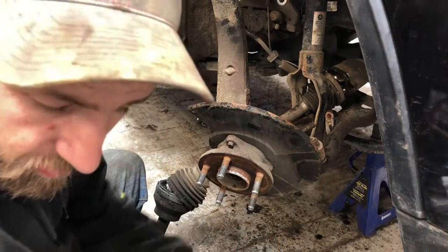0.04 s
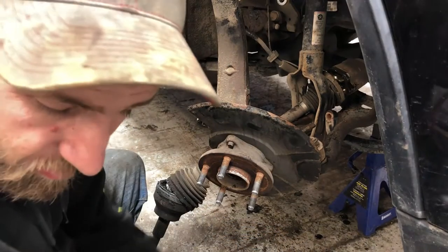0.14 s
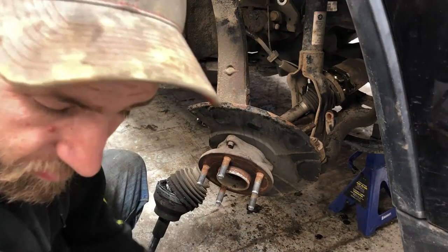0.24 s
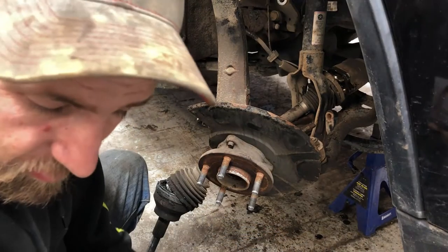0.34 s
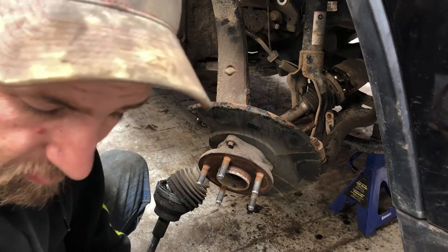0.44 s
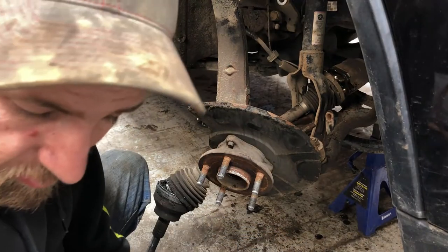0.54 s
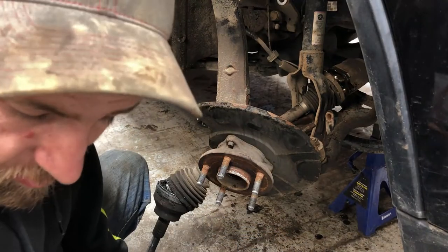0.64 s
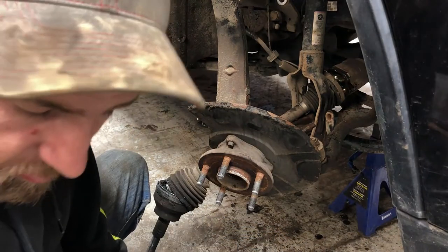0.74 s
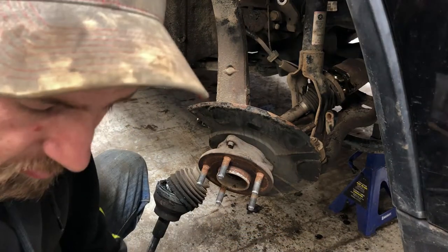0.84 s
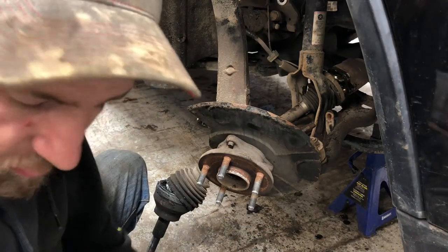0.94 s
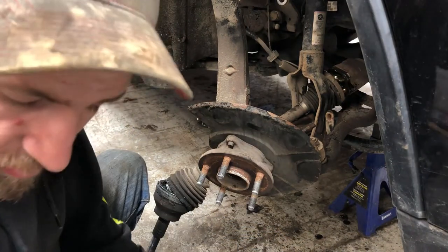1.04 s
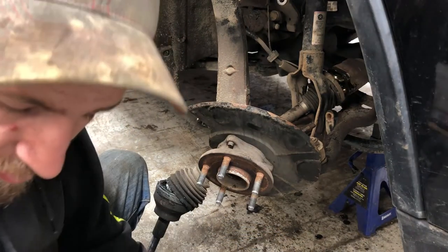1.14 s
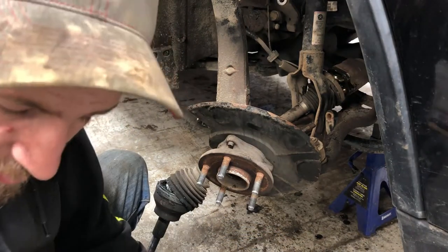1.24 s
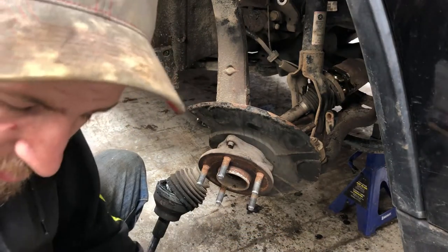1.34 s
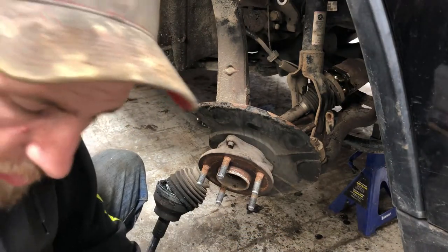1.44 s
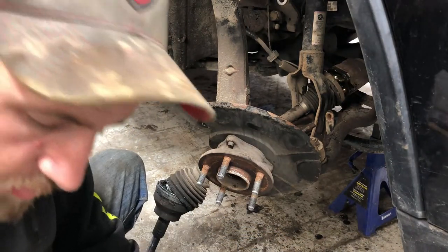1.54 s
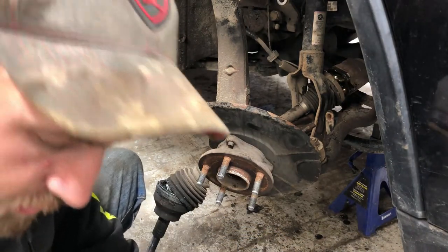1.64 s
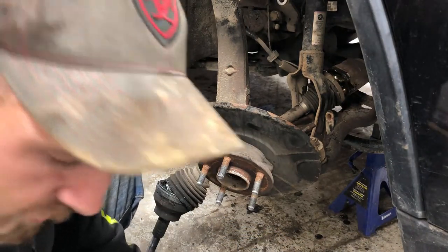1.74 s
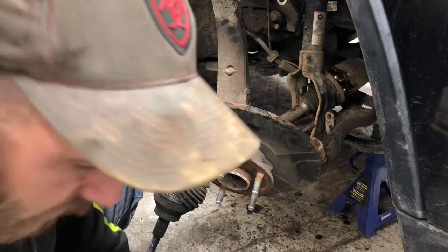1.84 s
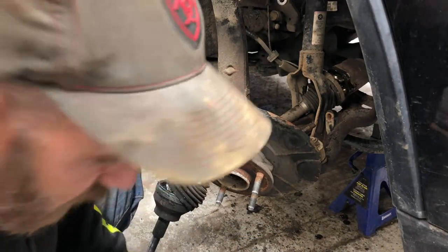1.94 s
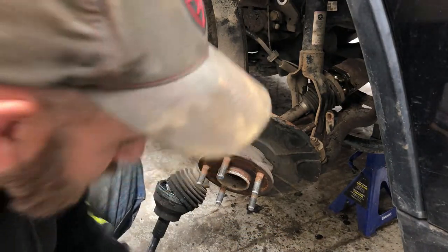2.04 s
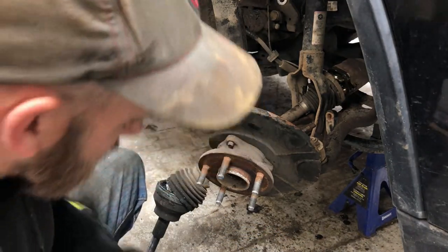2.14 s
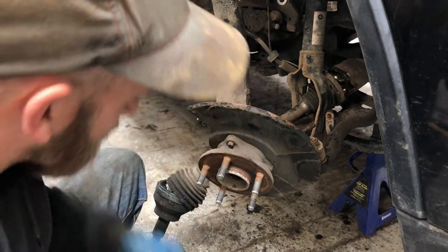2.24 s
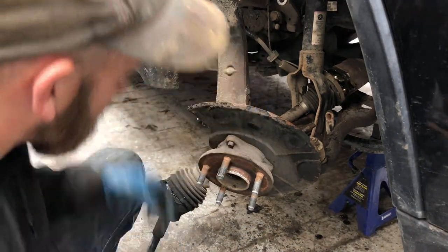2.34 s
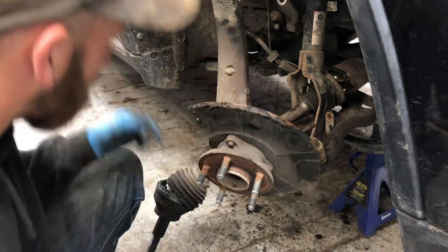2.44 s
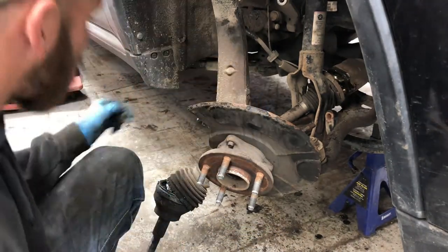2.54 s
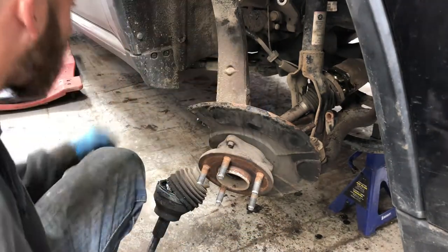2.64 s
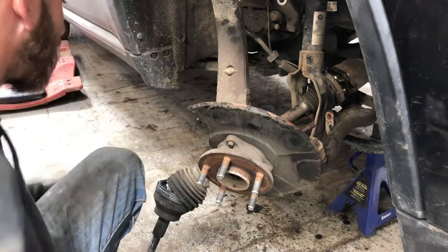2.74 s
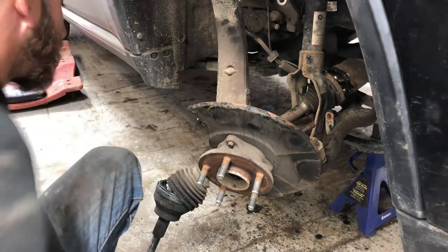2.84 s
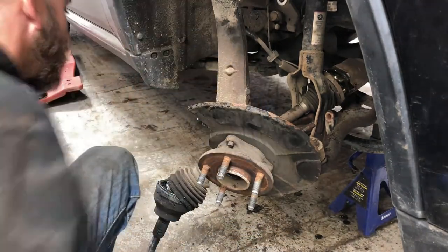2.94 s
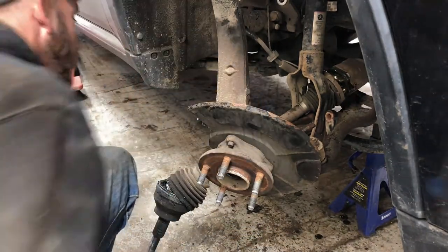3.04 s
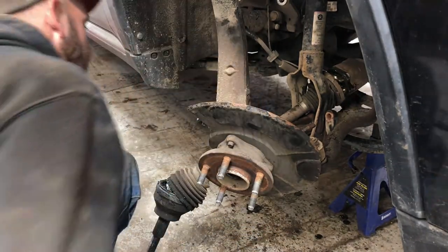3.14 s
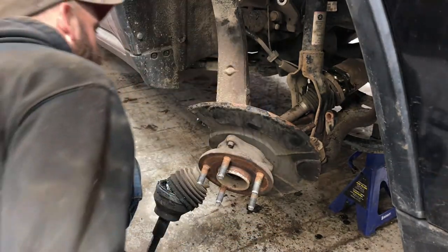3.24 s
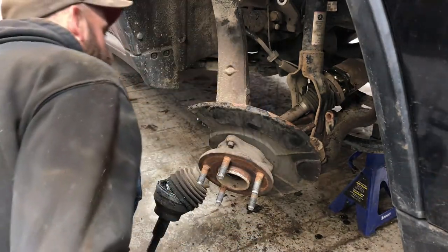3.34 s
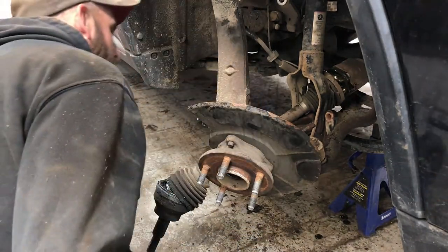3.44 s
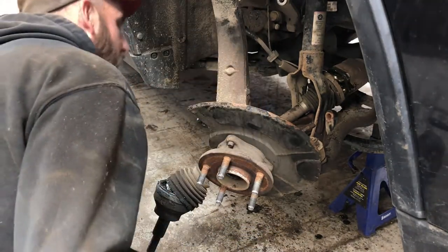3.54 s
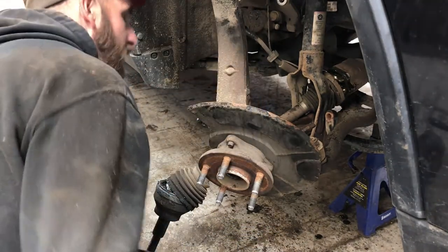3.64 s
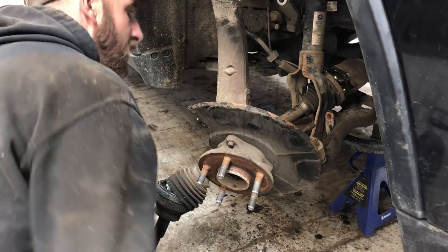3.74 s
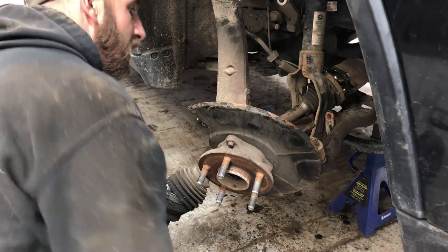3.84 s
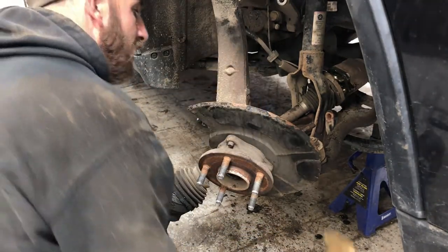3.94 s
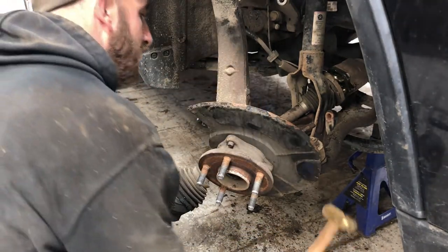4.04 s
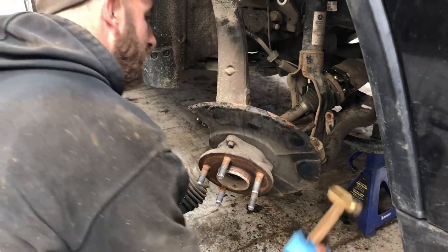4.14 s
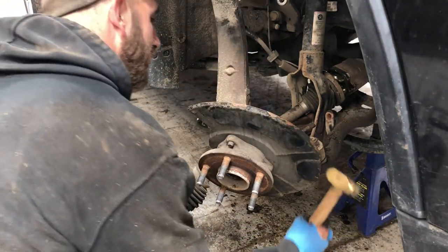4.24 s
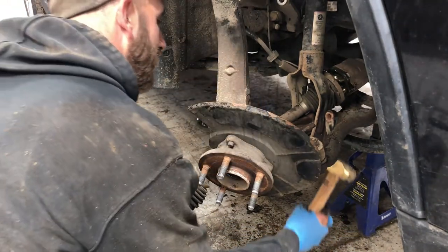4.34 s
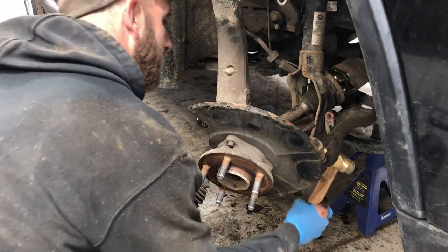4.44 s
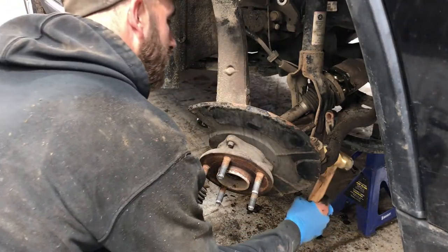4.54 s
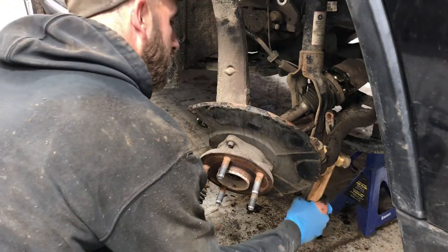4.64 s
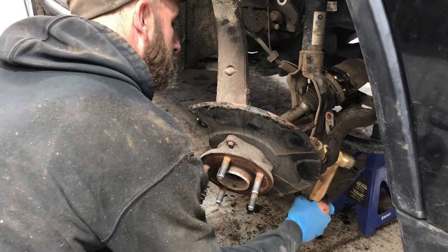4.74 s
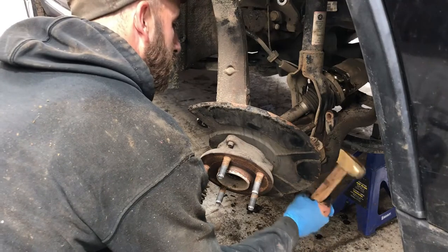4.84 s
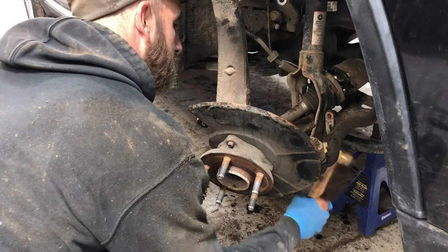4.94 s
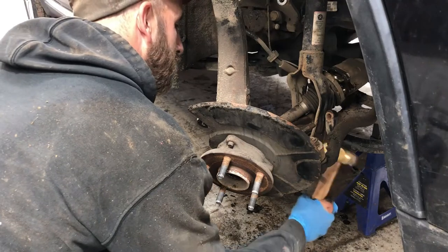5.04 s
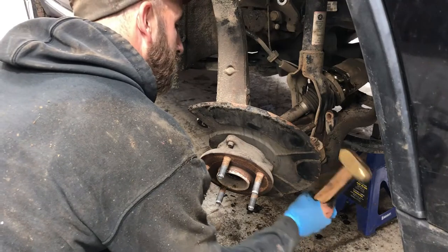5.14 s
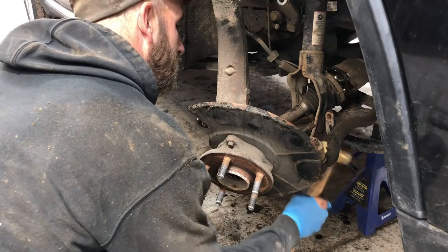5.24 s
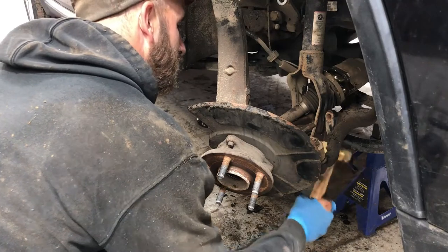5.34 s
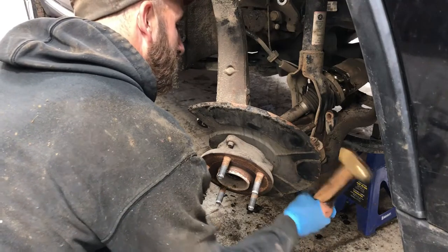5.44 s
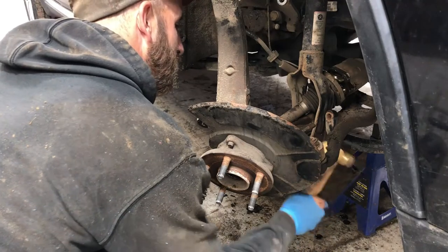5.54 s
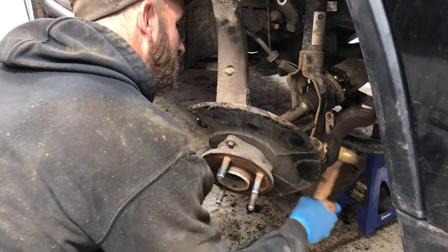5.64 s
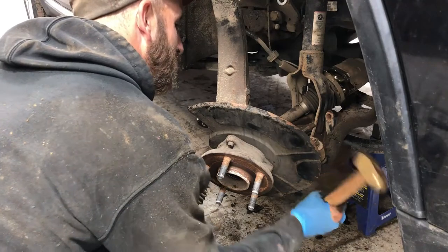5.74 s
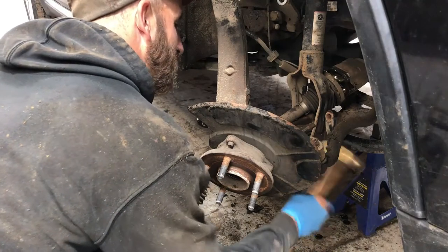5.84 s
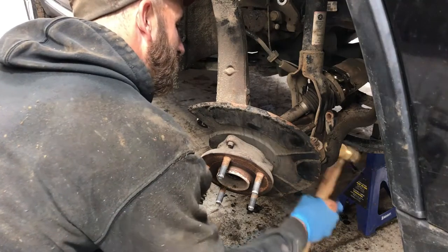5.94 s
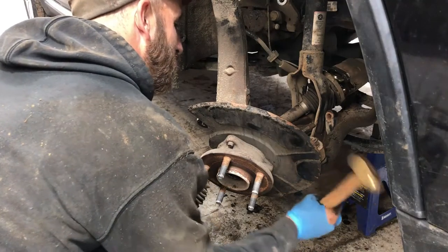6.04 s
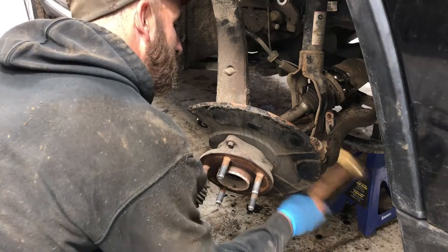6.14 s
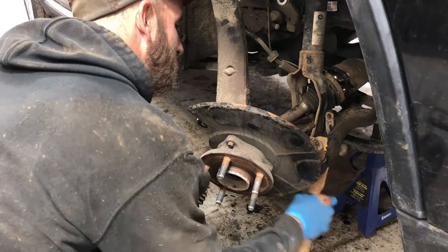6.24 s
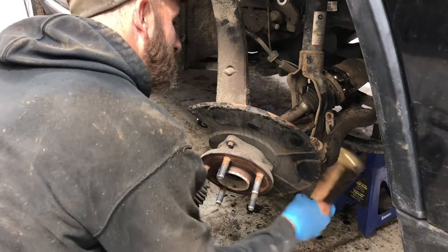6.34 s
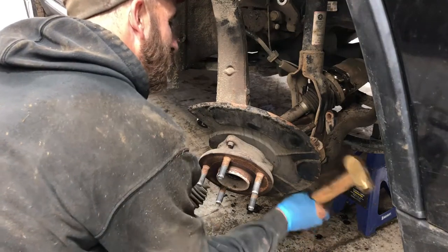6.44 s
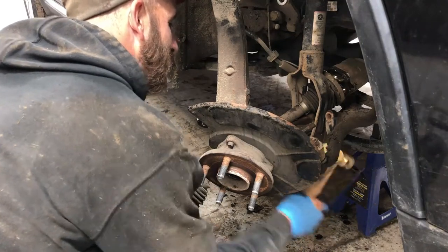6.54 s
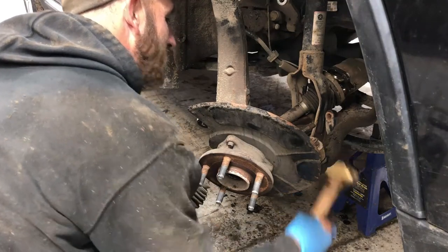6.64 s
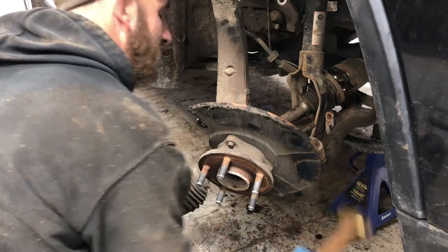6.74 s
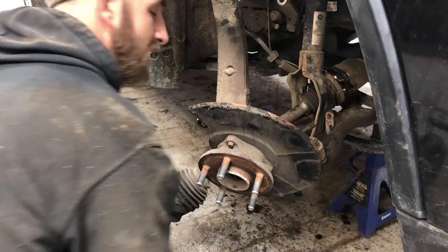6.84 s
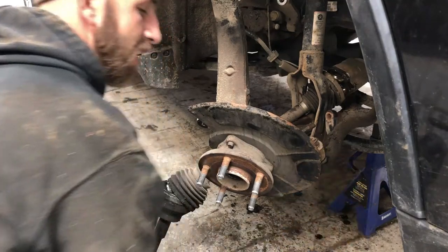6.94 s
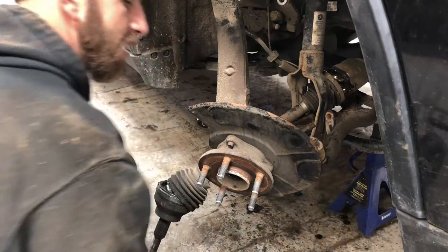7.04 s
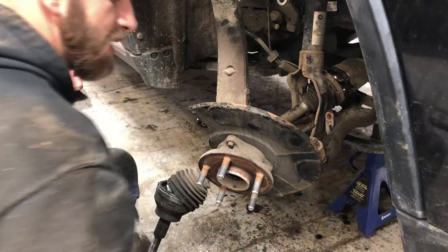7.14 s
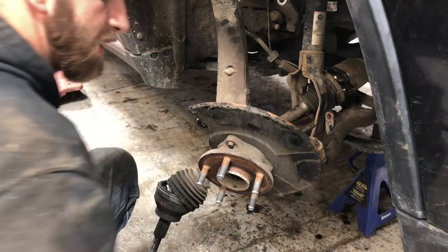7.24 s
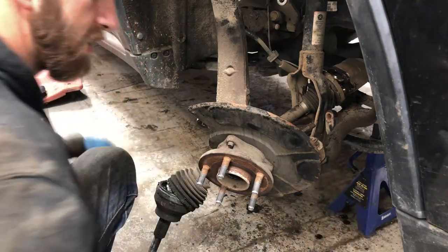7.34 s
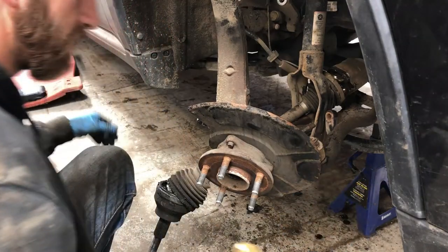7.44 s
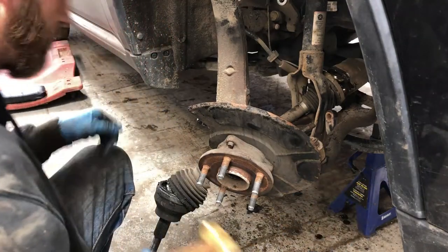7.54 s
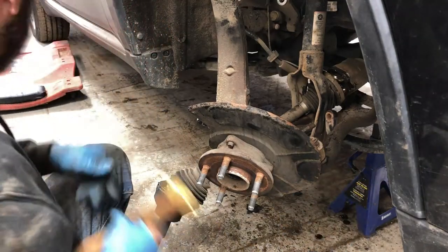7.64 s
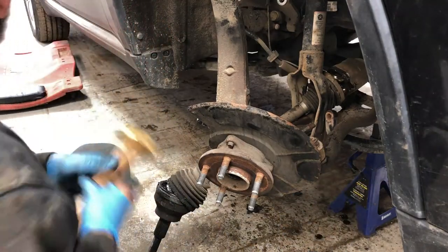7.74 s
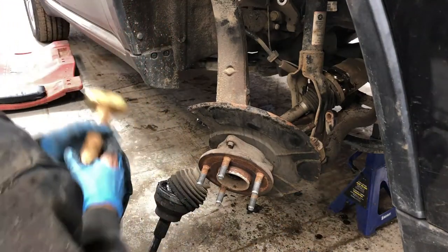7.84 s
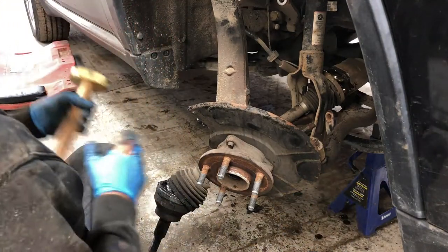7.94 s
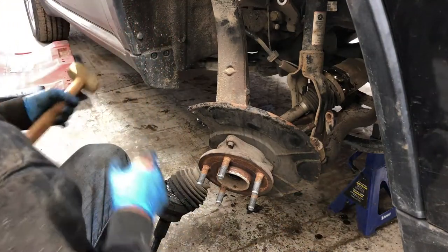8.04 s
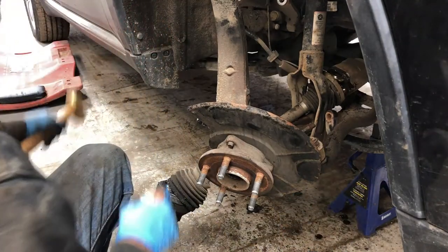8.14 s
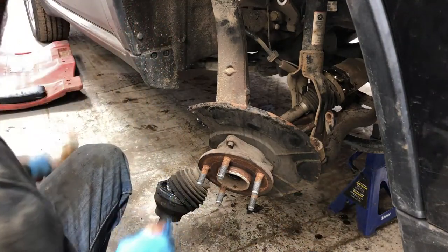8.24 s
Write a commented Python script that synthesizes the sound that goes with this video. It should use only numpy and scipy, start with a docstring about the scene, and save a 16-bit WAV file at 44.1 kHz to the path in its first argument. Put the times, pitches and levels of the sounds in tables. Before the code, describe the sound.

A lively garage, one fixed microphone close to the work. Someone kneels and shifts with faint cloth rustles and light tool ticks, then a heavy tool clatters on concrete. After more rustling, a hammer gives the steel axle one soft tap, then six very loud, evenly paced ringing clanks, one with a weak rebound. The echo dies away into quiet rustling and room air.

```python
"""Brass hammer on an axle, garage workshop

One microphone at an unchanging distance; someone kneels by a car and shifts small tools on the concrete.
Then the axle gets one tap and six hard blows, the third with a weaker contact close behind it.
Steel rings as decaying modes plus a noise burst; tools are band-passed knocks and thin sine pings.
Clothes rustle as grainy noise over room air and a faint hum; a dense noise tail is the lively room.
The loudest blows clip at the microphone input."""
import sys
import numpy as np
from scipy import signal
from scipy.fft import rfft, irfft
from scipy.io import wavfile
from scipy.ndimage import uniform_filter1d

SR = 44100
rng = np.random.default_rng(int(sys.argv[2]) if len(sys.argv) > 2 else 0)


def output_pcm(signal):
    """Save a mono or channel-first signal as 16-bit PCM at the path in sys.argv[1].

    Samples are clipped to [-1, 1] before scaling.
    """
    pcm = np.clip(np.atleast_2d(signal).T, -1, 1) * 32767
    wavfile.write(sys.argv[1], SR, np.round(pcm).astype(np.int16))


N = 366030  # length of the take [samples]

# Hammer contacts on the axle; level is that of the first 10 ms, before DRIVE_DB and the room:
# (time [s], level [dB], hardness as treble tilt [dB per octave], low body thud [dB])
HAMMER_BLOWS = [(4.718, -35, -5, -7.5), (5.002, -3, 1, -2.5), (5.299, 1.5, 2, 0), (5.594, 0.5, 1, -3),
                (5.654, -10, 0.5, -11.5), (5.908, 2, 2.5, 3), (6.219, 1.5, 1.5, 0), (6.558, 0.5, 0.5, -4)]
# Ringing modes of the axle, before tilt and RING_DB: (frequency [Hz], level [dB], t60 [s])
AXLE_MODES = [(134.6, -28, 1.3), (175.3, -33.5, 2.6), (191.5, -16, 0.46), (227, -32, 2.4), (234, -7, 0.25),
              (316, -7.5, 0.33), (420.5, -13.5, 0.46), (477.8, -9, 0.066), (638, -9, 0.15),
              (933, -18.5, 0.36), (1078, -18, 0.17), (1184, -13, .06), (1284, -10, 0.11),
              (2050, -16.5, 0.33), (2320, -19, 0.064), (2450, -19.5, .08), (2620, -15, 0.23),
              (3240, -16.5, 0.14), (2990, -9.5, 0.075), (3350, -12.5, 0.056), (3437, -4.5, .07),
              (3650, -12.5, 0.14), (4420, -16.5, 0.1), (4520, -21.5, 0.59), (6700, -10, .04),
              (6476, 1, 0.041), (6540, -16.5, 0.089), (8840, -19.5, .05), (12700, -30, .1)]
# Countless short modes of hub and suspension, as one burst: (frequency [Hz], level [dB], t60 [s])
HUB_CLANK = [(60, -29, .3), (127, -16, 0.084), (280, 3, 0.15), (500, -10.5, 0.17), (1230, 2, .07),
             (2070, 1.5, 0.074), (3330, 7.5, 0.031), (4460, 6, 0.03), (6400, -2, 0.06), (9110, -6, 0.036),
             (12000, -14, 0.031), (15000, -13, .02)]
RING_DB, DRIVE_DB = 4, -4  # axle ring against the clank; all blows together


def hammer(echo):
    """Each blow starts the same modes with new strengths; a softer contact excites less treble."""
    out, t = np.zeros(N), np.arange(2 * SR) / SR
    hz, mode_db, t60 = np.transpose(AXLE_MODES)[:, :, None]
    for start, level_db, tilt_db, thud_db in HAMMER_BLOWS:
        strength, detune, spacing, phase = rng.standard_normal((4, len(AXLE_MODES), 1))
        gain = undb(RING_DB + mode_db + tilt_db * np.log2(hz / 1000) + 2.3 * strength)
        # the modes beat, faster the higher they are
        beat_hz = 3 + .006 * hz * (2 + spacing)
        beating = 1 + .7 * np.cos(2 * np.pi * (beat_hz * t + phase))
        tones = np.sin(2 * np.pi * hz * (1 + .005 * detune) * t)
        blow = (gain * beating * tones * fade(t, t60)).sum(axis=0) * ending(len(t))
        add(blow, 0, burst(HUB_CLANK, 1 / 2, tilt_db))

        # the heavy parts take a moment to start moving
        low = signal.lfilter(*signal.butter(2, 550, fs=SR), blow)
        ring = (blow - low) * (1 - np.exp(-t / 0.001))
        thud = undb(thud_db) * low * (1 - np.exp(-t / 0.00066))
        blow = ring + thud
        blow *= undb(level_db + DRIVE_DB) / np.std(blow[:SR // 100])
        add(out, start, blow)
        add(out, start, reverb(blow[:SR // 10], echo, octaves=.12))
    return out


# Tools knocked or set down, and the dull body of the first tap; level is the peak of 2 ms rms, dry:
# (time [s], level [dB], centre [Hz], t60 [s], width [octaves], room send [dB])
TOOL_KNOCKS = [(.137, -50.5, 872, 0.052, 0.18, 5.5), (0.136, -47.5, 129, 0.065, 0.73, -0.5),
               (.221, -53, 2500, 0.013, 1.1, -2), (0.25, -49, 1400, 0.014, 1.4, -5),
               (0.363, -58.5, 200, .04, 0.58, -11), (.414, -60, 4000, .01, 1, 15),
               (0.691, -42, 4960, 0.012, 10, -1), (.779, -43, 1750, 0.062, 2.4, 6.5),
               (0.878, -51, 490, 0.074, 2.2, -0.5), (1.396, -56, 3840, 0.02, 1.2, 23),
               (1.579, -55, 4350, 0.036, 1.1, 13), (1.638, -24, 2520, 0.073, 1.76, 5),
               (1.642, -25.5, 1063, 0.085, 1.25, 0.5), (1.655, -31, 2500, 0.057, 2.4, -5),
               (1.764, -20.5, 606, 0.19, 1.95, 3), (1.772, -9.5, 1896, .012, 3, 3),
               (1.775, -43, 45, 0.58, 1.5, -9), (1.779, -16, 1470, 0.014, 3, -7),
               (1.794, -19, 1292, 0.028, 2.9, -2), (1.803, -26.5, 1765, 0.035, 2, 6.5),
               (1.878, -28, 670, 0.02, 2.6, 6), (1.913, -32, 2790, 0.011, 1.5, -5),
               (1.924, -33, 2450, 0.0029, 0.28, 12), (2.199, -29, 730, 0.16, 2.24, 3.5),
               (2.206, -23, 430, 0.034, 1.78, 2), (2.203, -45.5, 3500, 0.028, 1.9, 14.5),
               (2.281, -59, 9000, 0.011, 1.5, 0), (2.614, -37.5, 3260, 0.034, 1.8, 4),
               (3.06, -57.5, 70, 0.089, 1.4, 3), (3.094, -52.5, 2780, 0.036, 0.57, 8),
               (4.164, -60, 3040, 0.0088, 1.48, 3), (4.722, -35.5, 600, 0.28, 0.22, 3.5),
               (4.719, -39, 430, 0.31, .5, 6.5), (4.718, -33.5, 1250, 0.12, 1.2, 2)]
# A small hard steel part with one thin ring, touched several times: (time [s], level [dB])
STEEL_PINGS = [(.893, -64), (1.638, -55), (1.772, -53), (1.815, -55)]
PING_HZ, PING_T60_S = 11368, .55
# Modes of another steel tool, clinked once: (frequency [Hz], level [dB], t60 [s])
CLINK_MODES = [(3340, -44, .06), (9340, -71, .2), (10420, -58, .12), (13500, -72, .07)]
CLINK_S = 2.613  # time of the clink


def tools(echo):
    """Short knocks on concrete are damped noise with reverberation; thin steel parts ring as dry sines."""
    out, t = np.zeros(N), np.arange(SR // 2) / SR
    for start, level_db, hz, t60, octaves, room_db in TOOL_KNOCKS:
        push = rng.standard_normal(len(t)) * fade(t, t60)
        push[0] += 4.0  # the first contact is a sharp click
        knock = band(push, hz, max(octaves, .2))
        peak = np.sqrt(np.max(uniform_filter1d(knock ** 2, size=90)))
        knock = undb(level_db) * knock / peak
        add(out, start, knock)
        add(out, start, undb(room_db) * reverb(knock, echo, octaves=.3))

    pings = [(start, PING_HZ, db, PING_T60_S) for start, db in STEEL_PINGS]
    pings += [(CLINK_S, *mode) for mode in CLINK_MODES]
    for start, hz, db, t60 in pings:
        # a close pair of modes beats
        pair = np.sin(2 * np.pi * hz * t) + .3 * np.sin(2 * np.pi * 1.0012 * hz * t)
        add(out, start, undb(db) * fade(t, t60) * pair)
    return out


# Colour of sliding cloth: (frequency [Hz], relative density [dB per Hz])
CLOTH_COLOUR = [(1000, -21.5), (2700, -6.5), (3200, -2), (3700, -7), (5500, 2), (8000, 1), (11000, -9.5),
                (16000, -13.5)]
# Cloth and gloves sliding: (loudest time [s], level [dB], 20 dB swell [s], 20 dB fade [s])
CLOTH_RUSTLES = [(.24, -67, .2, .08), (.402, -64, .025, .11), (.782, -63, .01, .08), (.89, -67, .04, .09),
                 (1.015, -70, .03, .11), (1.26, -71, .12, .12), (1.41, -70, .05, .5), (1.582, -67, .03, .1),
                 (2.142, -59, .02, .05), (2.202, -58, .02, .05), (2.355, -61, .02, .1), (2.46, -71, .1, .2),
                 (2.613, -53, .005, .04), (2.72, -69, .2, .15), (2.93, -70, .3, .12), (3.085, -76, .04, .1),
                 (3.2, -65, .025, .1), (3.5, -76, .3, .2), (3.8, -57, .1, .11), (4.09, -70, .15, .1),
                 (4.24, -77, .2, .2), (4.41, -75, .02, .02), (7.17, -70, .05, .08), (7.32, -71, .2, .12),
                 (7.46, -69, .02, .14), (7.59, -59, .02, .06), (7.79, -64, .03, .1), (7.83, -60, .1, .045),
                 (7.925, -62, .12, .07), (8.09, -70, .18, .12), (8.28, -76, .12, .1)]
# A knee or boot shifting, duller; swells and fades below 2 ms play as 2 ms:
# (loudest time [s], level [dB], 20 dB swell [s], 20 dB fade [s])
KNEE_SHUFFLES = [(.22, -56, -0.8, -1.9), (.41, -60, 0.2, 2.5), (.75, -62, 0, -3.2),
                 (.782, -35.5, -0.0849, -0.98), (1.41, -62.5, 0, 3.1), (2.75, -64, 4.6, 0.76),
                 (3.096, -59, -0.46, 0.13), (3.14, -71, 1.2, -0.7), (3.498, -70, -2.3, -0.8),
                 (3.83, -70.5, 2.5, 1), (7.55, -70.5, 4.4, -0.5), (7.775, -67, 1.3, 0.5),
                 (8.3, -62, 0.12, .1)]
# The thin squeak within some rustles: (middle time [s], half length [s], level [dB])
CLOTH_SQUEAKS = [(3.78, .05, -73), (7.82, .04, -69), (7.90, .03, -74)]
SQUEAK_HZ = 3160


def clothes():
    """Fabric rubs in fine grains, bright when it slides, duller when a knee shifts."""
    t = np.arange(N) / SR
    grains = undb(2.5 * walk(400) + .8 * walk(60))
    rustle = colour(rng.standard_normal(N) * grains, CLOTH_COLOUR)
    shuffle = unit(band(rng.standard_normal(N), 500, 2.9)) * undb(1.2 * walk(33))
    squeak = unit(band(rng.standard_normal(N), SQUEAK_HZ, .07))
    squeak_gain = sum(undb(db) * np.exp(-((t - middle) / half) ** 4) for middle, half, db in CLOTH_SQUEAKS)
    return swells(CLOTH_RUSTLES) * rustle + swells(KNEE_SHUFFLES) * shuffle + squeak_gain * squeak


# Colour of the room air: (frequency [Hz], relative density [dB per Hz])
AIR_COLOUR = [(20, -13.5), (35, -6), (60, 0.5), (120, -3), (250, -4.5), (450, -10), (800, -11),
              (1300, -9.5), (2200, -16), (4000, -21), (8000, -27), (16000, -36)]
# Low thumps through the floor; swells and fades below 2 ms play as 2 ms:
# (loudest time [s], level [dB], 20 dB swell [s], 20 dB fade [s])
FLOOR_THUMPS = [(0.02, -47, 5, 0.28), (.15, -61, 2, 0.3), (.36, -58, -1.5, .05)]
AIR_DB, HUM_DB, HUM_HZ = -64.5, -73, 119


def background():
    """Steady noise is the room air, a very narrow noise band the wavering hum, a low band the early thumps."""
    hum = unit(band(rng.standard_normal(N), HUM_HZ, 0.085))
    thump = unit(band(rng.standard_normal(N), 51, 0.87))
    air = colour(rng.standard_normal(N), AIR_COLOUR)
    return undb(AIR_DB) * air + undb(HUM_DB) * hum + swells(FLOOR_THUMPS) * thump


# Reverberation of the garage, before ROOM_DB: (frequency [Hz], level [dB], t60 [s])
ROOM_DECAY = [(49, -27, 2.4), (123, -22, 0.81), (216, -23, 1.01), (435, -25, 0.9), (740.7, -24, 0.91),
              (1260, -19, 1), (1671, -25, 1.4), (2620, -20.5, 0.99), (3200, -24.5, 1.73),
              (4860, -16.5, 1.1), (6500, -18.5, 1.1), (7560, -17.5, 0.59), (8100, -12.5, 0.85),
              (10500, -19, 0.5), (13000, -14, 0.58), (15500, -16.5, 0.29)]
ROOM_DB, ROOM_RISE_S = -40.5, 0.0021


def room():
    """The echo of the garage is dense noise that builds up quickly and dies at its own pace in each band."""
    echo = burst(ROOM_DECAY, 1.8)
    rise = 1 - np.exp(-np.arange(len(echo)) / SR / ROOM_RISE_S)
    return echo * rise * undb(ROOM_DB)


def reverb(x, echo, octaves):
    """The diffuse tail takes on the broad colour of the sound that starts it."""
    total = np.cumsum(np.abs(rfft(x, len(echo))) ** 2)
    k = np.arange(len(total))
    lo = (k * 2 ** -octaves).astype(int)
    hi = np.minimum((k * 2 ** octaves).astype(int) + 1, k[-1])
    broad_colour = np.sqrt((total[hi] - total[lo]) / (hi - lo))
    return irfft(rfft(echo) * broad_colour, len(echo)) * ending(len(echo))


def undb(db):
    """Amplitude of a level in dB."""
    return 10 ** (np.asarray(db) / 20)


def unit(x):
    """Scale to rms 1."""
    return x / np.sqrt(np.mean(x ** 2))


def fade(t, t60):
    """Exponential decay that loses 60 dB in t60 seconds."""
    return np.exp(-np.log(1000) * t / np.maximum(t60, .002))


def ending(size):
    """Gain that runs out to silence over the later part of a long tail."""
    return np.clip(np.linspace(3, -1 / 2, size), 0, 1) ** 2


def band(x, hz, octaves):
    """Band-pass around hz, with edges kept inside the audible range."""
    edges = np.clip(hz * 2. ** (np.array([-.5, .5]) * octaves), 10, [.4 * SR, .45 * SR])
    return signal.sosfilt(signal.butter(2, edges, "bandpass", fs=SR, output="sos"), x)


def burst(table, seconds, tilt_db=0):
    """Noise whose third-octave bands each have their own strength and decay; tilt in dB per octave."""
    t = np.arange(int(seconds * SR)) / SR
    hz, db, t60 = np.transpose(table)
    out = 0
    for f in 35 * 2 ** np.arange(0, 9, 1 / 3):
        band_db = np.interp(np.log(f), np.log(hz), db)
        band_t60 = np.interp(np.log(f), np.log(hz), t60)
        gain = undb(band_db + tilt_db * np.log2(f / 1000))
        out = out + gain * unit(band(rng.standard_normal(len(t)), f, 1 / 3)) * fade(t, band_t60)
    return out


def colour(x, table):
    """Shape noise by (frequency [Hz], level [dB]) points; rms 1."""
    f = np.fft.rfftfreq(len(x), 1 / SR) + 1  # 1 Hz up, to keep the logarithm finite
    hz, db = np.transpose(table)
    gain = undb(np.interp(np.log(f), np.log(hz), db))
    return unit(irfft(rfft(x) * gain, len(x)))


def walk(rate):
    """Random levels, one every 1 / rate seconds, joined by straight ramps."""
    k = int(SR / rate)
    return uniform_filter1d(np.repeat(rng.standard_normal(N // k + 1), k), k)[:N]


def swells(table):
    """Gain of sounds that each rise to a peak and die away, evenly in dB; their powers add."""
    t, power = np.arange(N) / SR, 0
    for peak_s, db, rise_s, fall_s in table:
        before = (peak_s - t) / max(rise_s, .002)
        after = (t - peak_s) / max(fall_s, .002)
        power = power + undb(db - 20 * np.maximum(before, after)) ** 2
    return np.sqrt(power)


def add(track, start, x):
    """Lay a sound into the track from start [s]."""
    i = int(start * SR)
    track[i:i + len(x)] += x[:N - i]


def scene():
    """All sources in the same garage, as one channel."""
    echo = room()
    return (hammer(echo) + tools(echo) + clothes() + background())[None]


# Bumps and dips of the microphone: (frequency [Hz], width [octaves], level [dB])
MIC_COLOUR = [(1190, 0.22, 3.5), (1570, 0.61, -4), (3320, 0.15, 4), (5580, 0.048, -1), (5960, 0.081, 1)]
TOP_HZ = 15900


def record(dry):
    """The microphone has its own colour, the input clips on the hardest blows, the top is cut."""
    x = dry
    for hz, octaves, db in MIC_COLOUR:
        peak = signal.iirpeak(hz, np.sqrt(2) / max(octaves, .05), fs=SR)
        x = x + (undb(db) - 1) * signal.lfilter(*peak, x)
    clipped = np.clip(x, -.92, .92)
    return signal.sosfilt(signal.ellip(8, .2, 70, TOP_HZ, fs=SR, output="sos"), clipped)


dry = scene()
out = record(dry)
output_pcm(out)
```